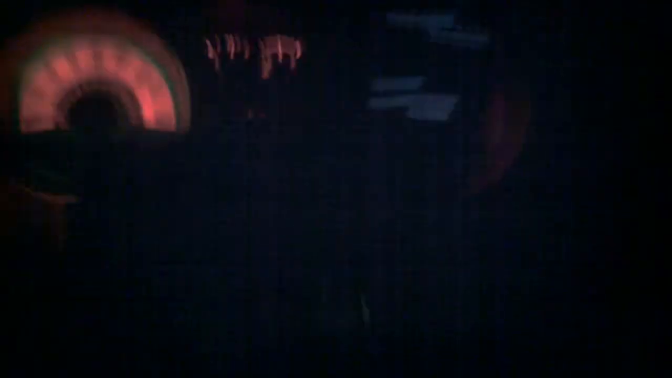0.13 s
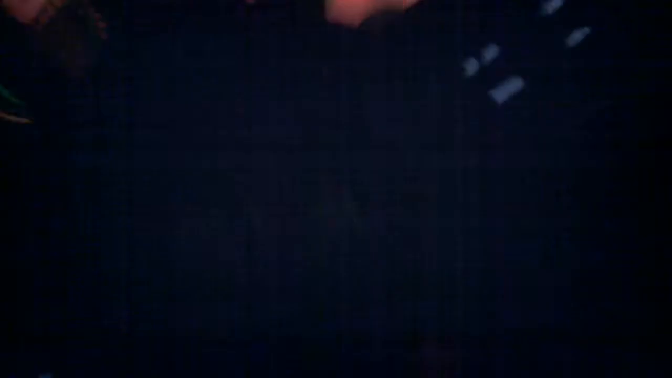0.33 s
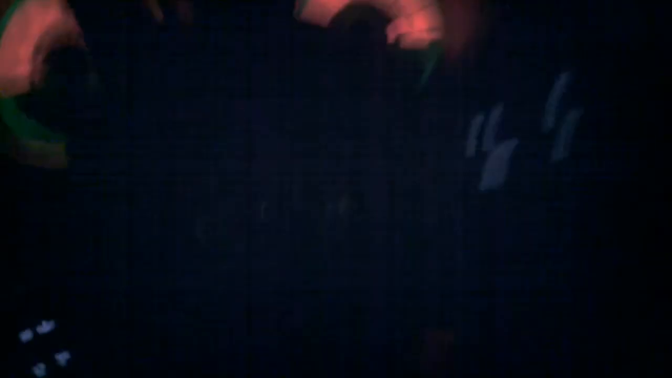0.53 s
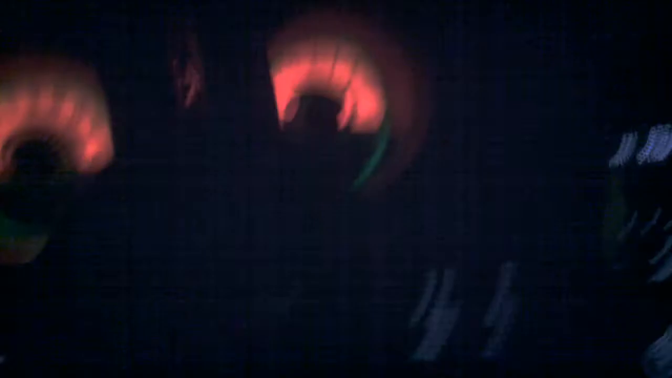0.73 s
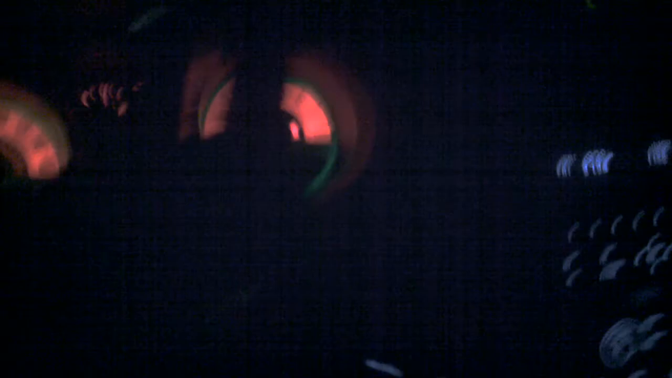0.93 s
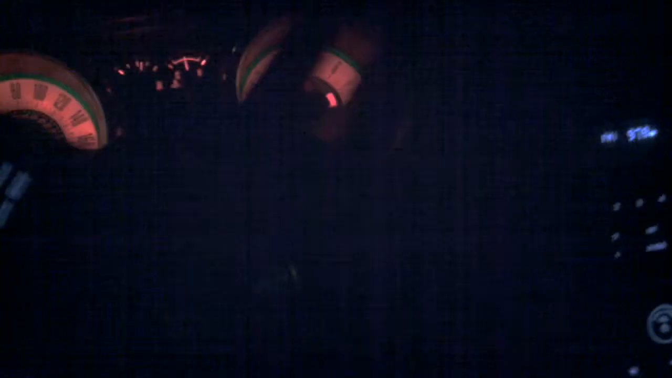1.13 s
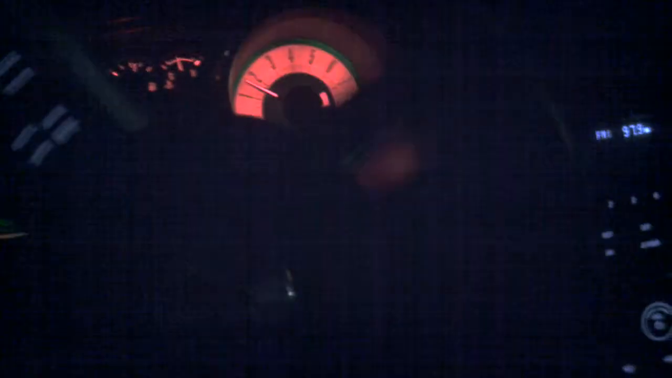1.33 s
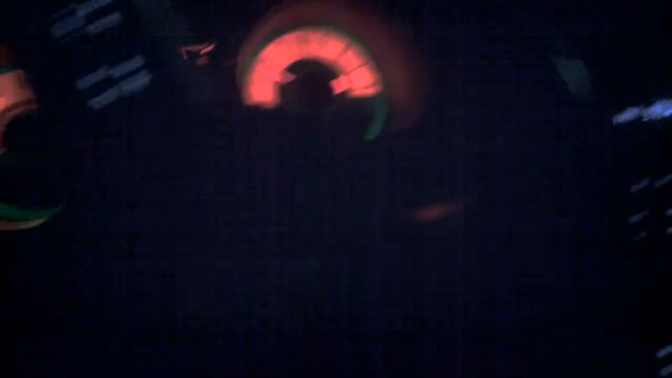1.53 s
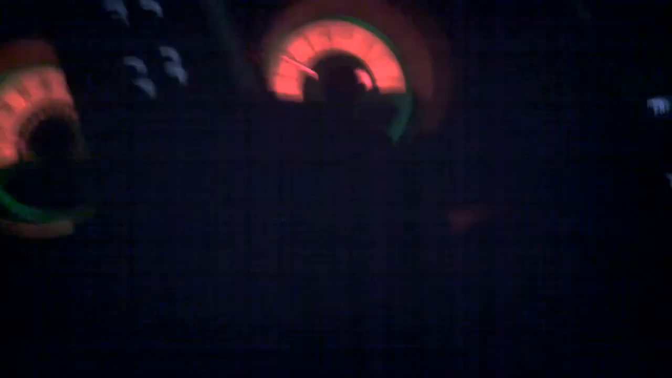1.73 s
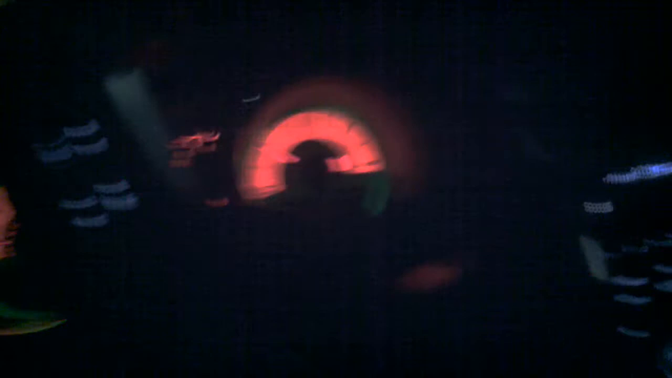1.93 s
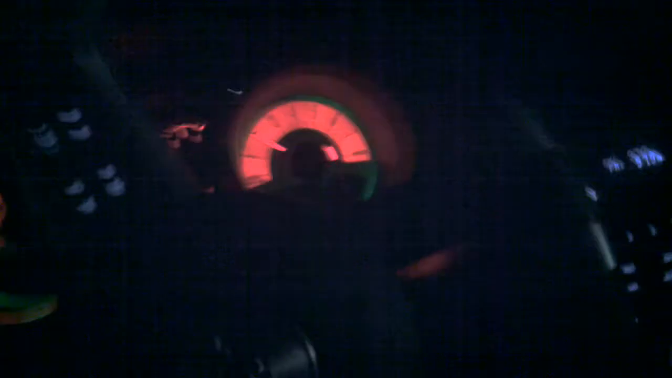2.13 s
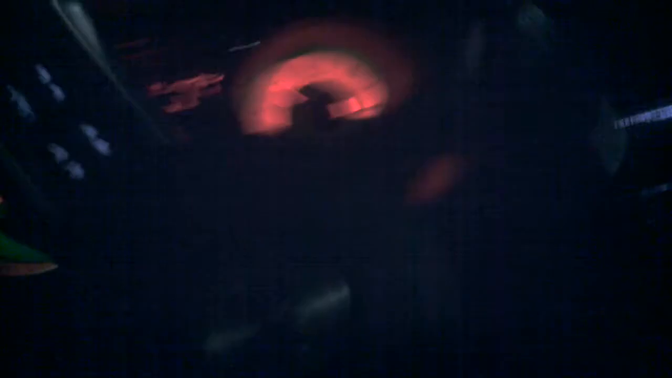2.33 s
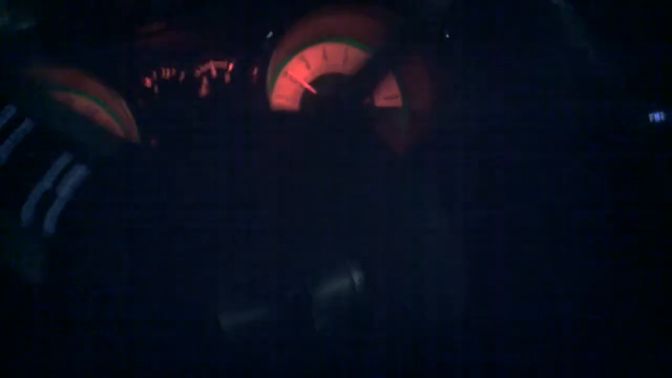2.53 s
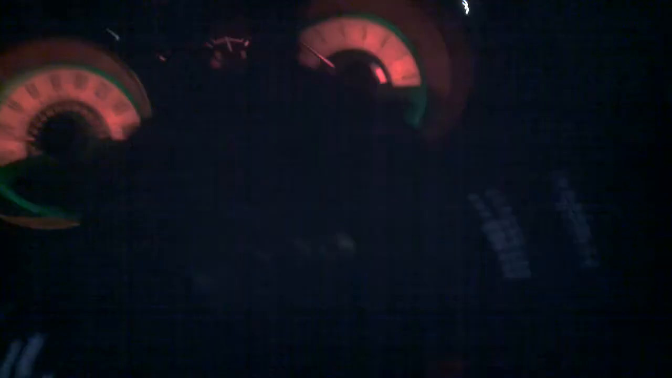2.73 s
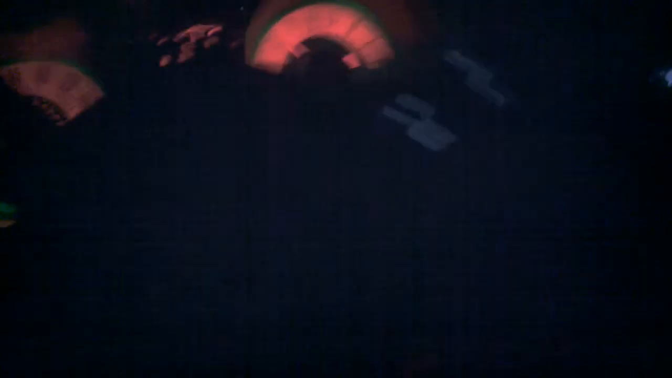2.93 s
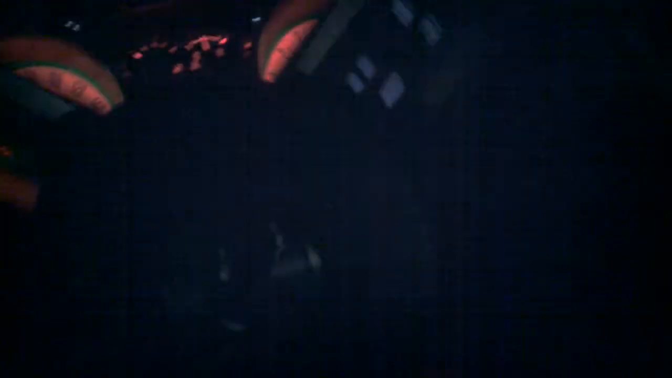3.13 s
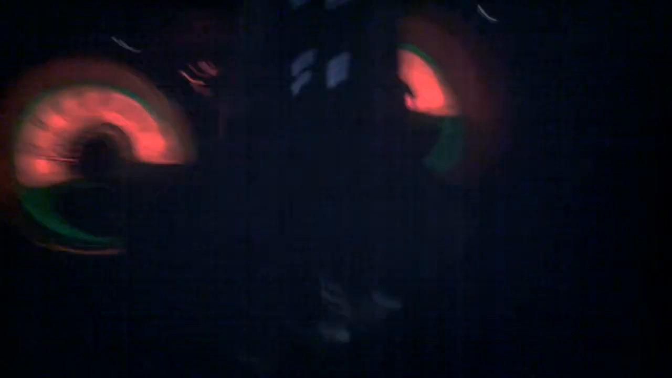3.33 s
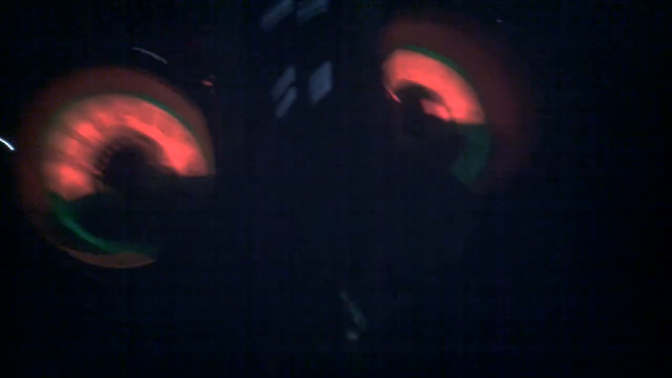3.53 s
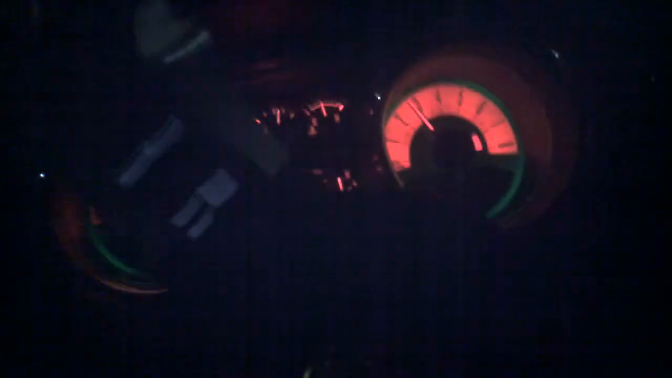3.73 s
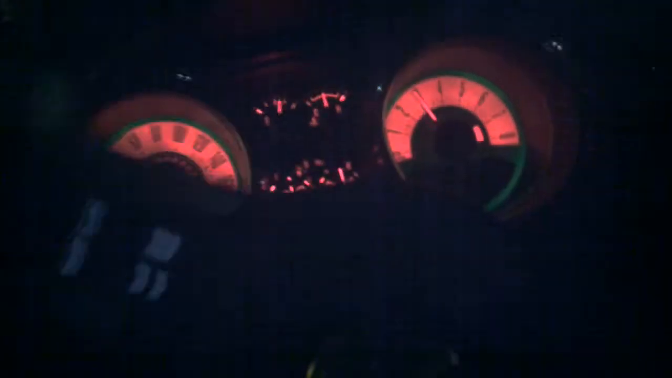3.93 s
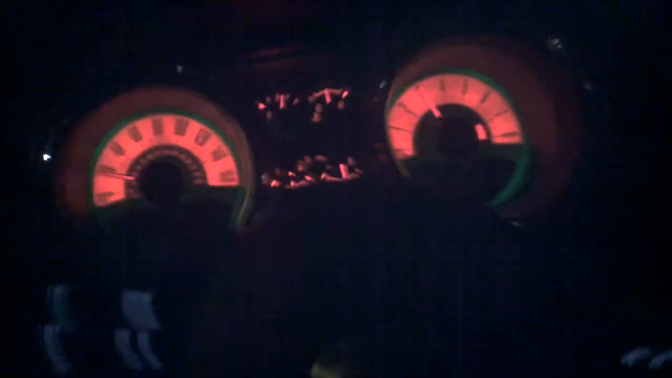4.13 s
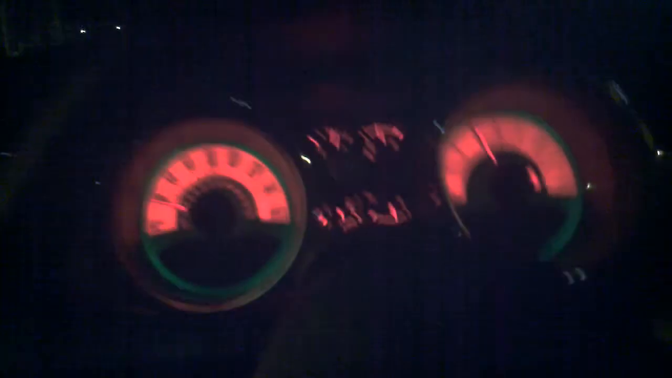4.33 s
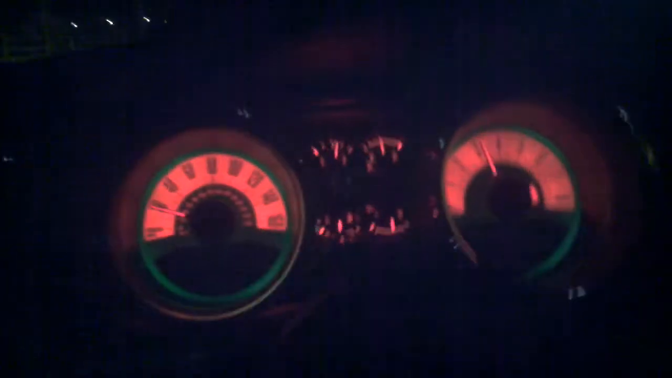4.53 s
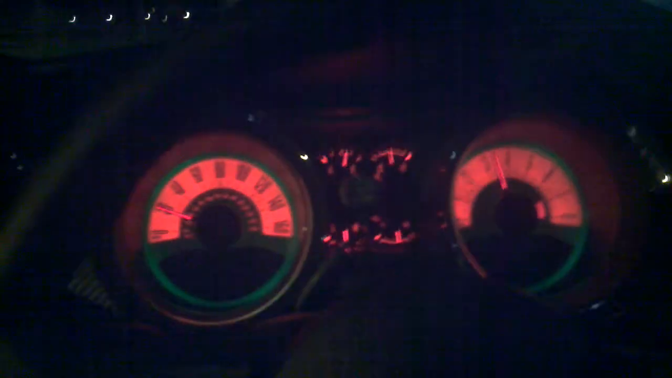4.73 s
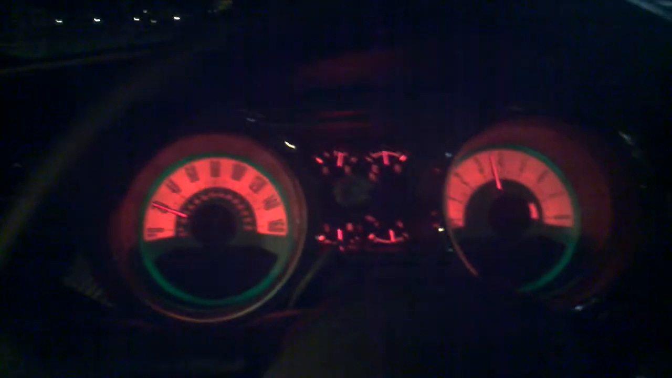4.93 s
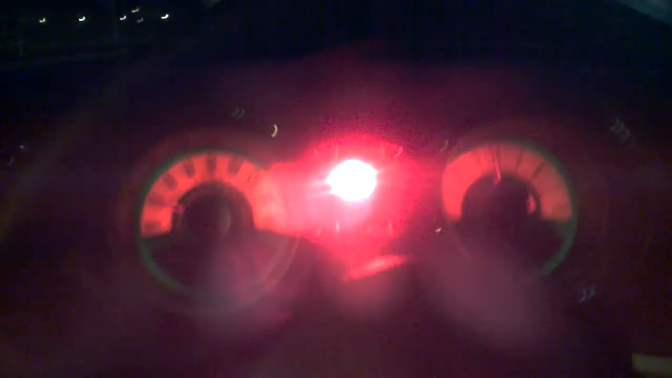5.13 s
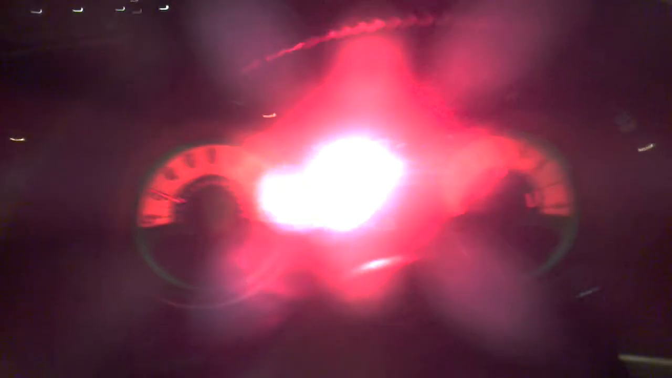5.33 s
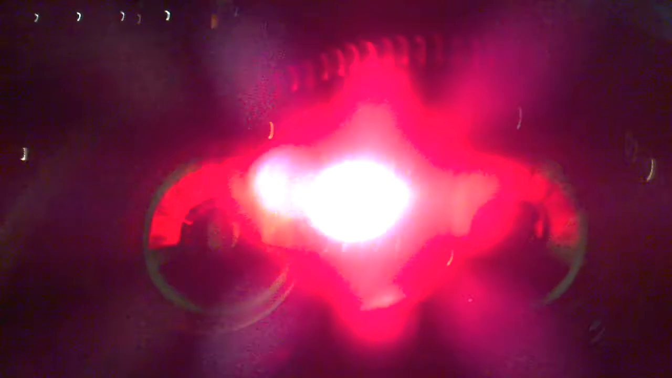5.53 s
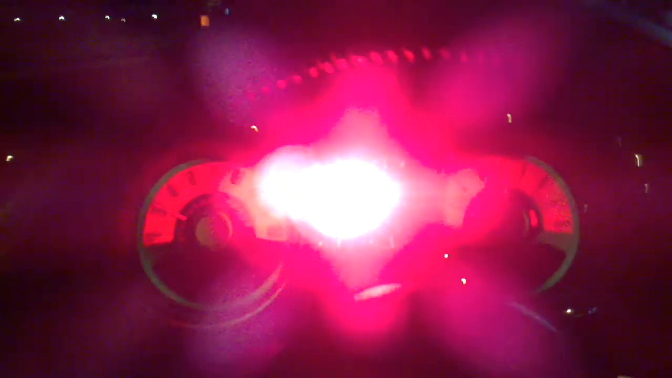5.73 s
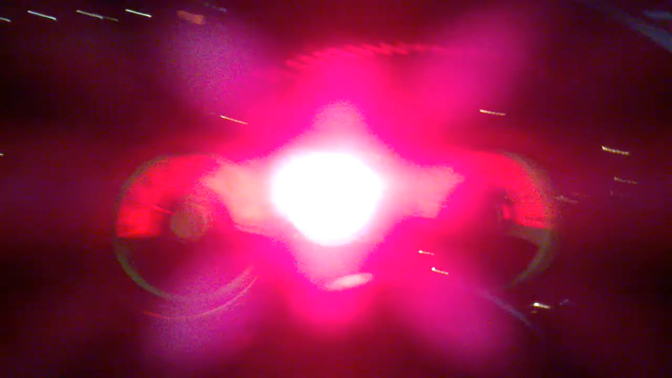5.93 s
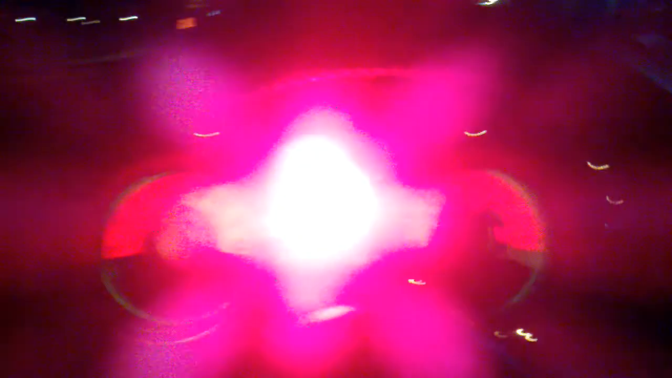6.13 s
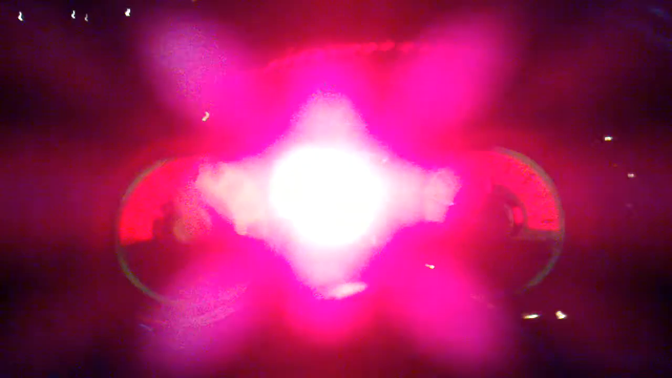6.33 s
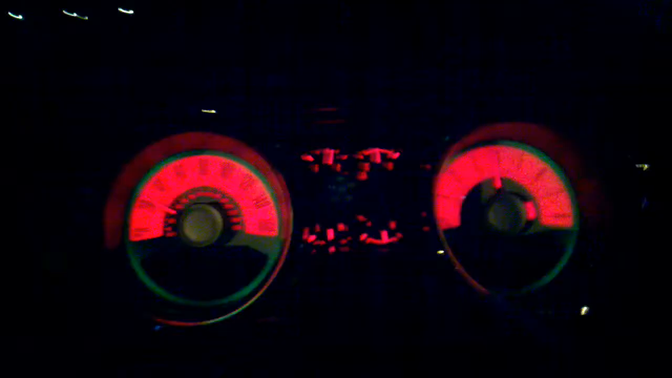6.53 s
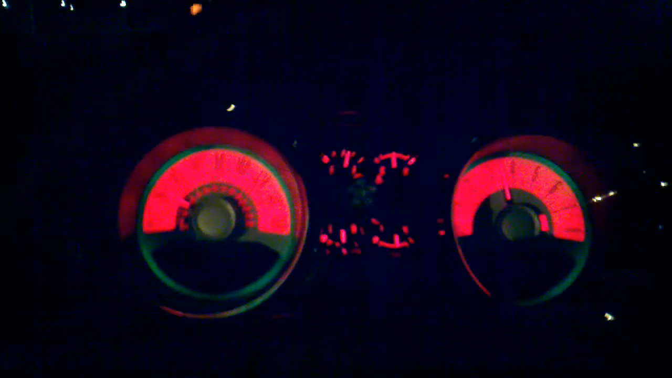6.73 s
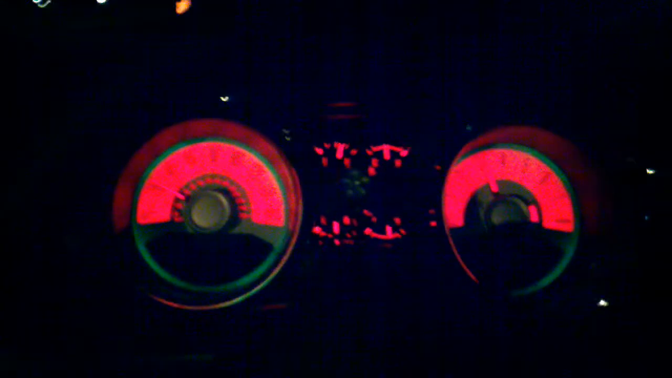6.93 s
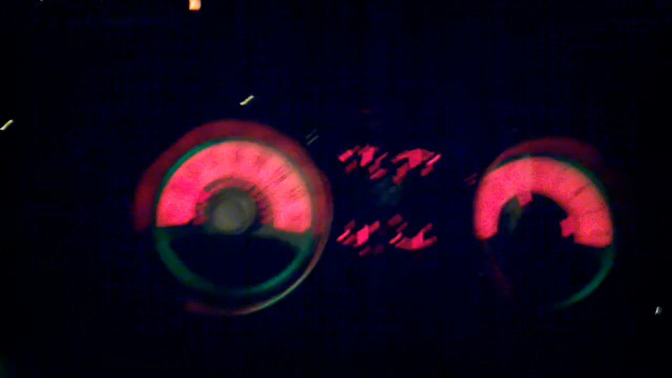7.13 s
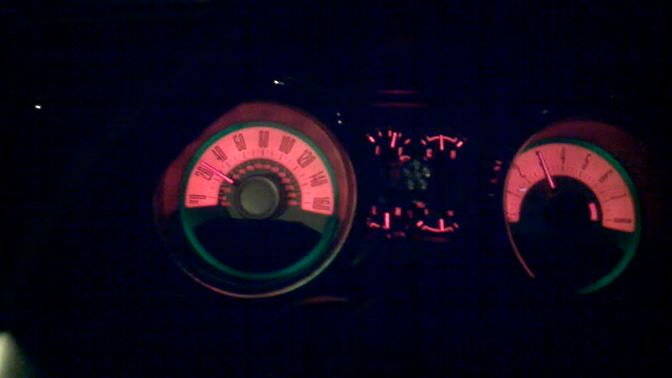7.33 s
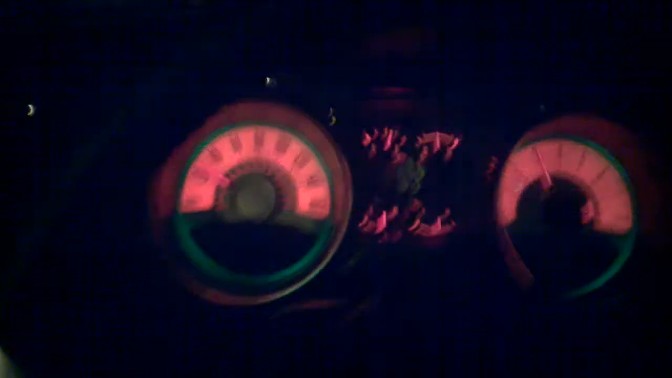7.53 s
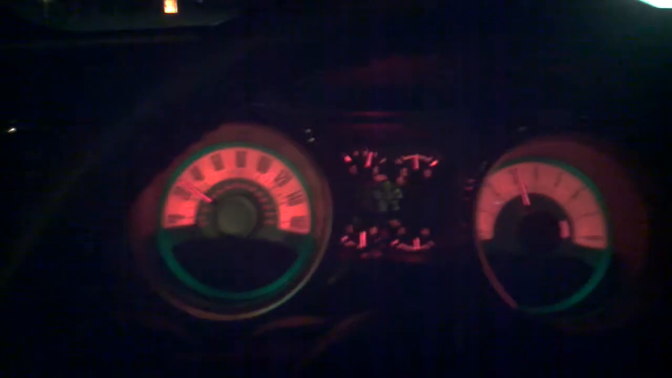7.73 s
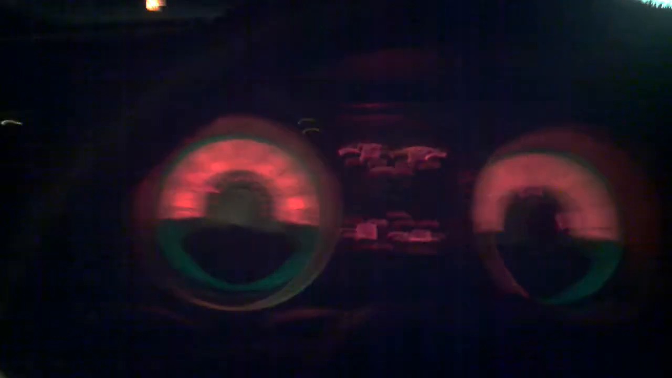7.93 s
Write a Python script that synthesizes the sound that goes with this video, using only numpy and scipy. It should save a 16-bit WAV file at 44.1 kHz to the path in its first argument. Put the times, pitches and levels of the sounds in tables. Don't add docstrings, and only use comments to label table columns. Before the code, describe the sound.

A handheld close stereo microphone in a car cabin catches a V8 accelerating. Low uneven rumble and shuddering thumps come first, with light key clinks, scuffs and one hard knock near two seconds. Revs rise smoothly, a faint gear whine beneath, until intake roar fills the cabin. A brief lift brings falling pitch and soft pops, then a sudden loud pull in the next gear to an abrupt end.

```python
import sys
import numpy as np
from scipy import signal
from scipy.fft import rfft, irfft, next_fast_len
from scipy.io import wavfile
from scipy.ndimage import uniform_filter1d

SR = 44100
rng = np.random.default_rng(int(sys.argv[2]) if len(sys.argv) > 2 else 0)


def persist_wave(psi):
    counts = np.round(np.clip(psi, -1, 1) * 32767).astype(np.int16)
    wavfile.write(sys.argv[1], SR, np.atleast_2d(counts).T)


def ratio(d):
    e = np.asarray(d, float) / 20
    return 10 ** e


N = 356328

# time_s, cycle_hz
CYCLE_RATE = [(0.0, 7.7), (0.45, 9.6), (0.95, 12.05), (1.12, 12.9), (2.81, 19.2), (3.42, 21.9),
              (4.12, 25.4), (4.61, 28.5), (5.2, 31.9), (5.93, 35.3), (6.0, 34.3), (6.14, 33.3),
              (6.34, 30.7), (6.6, 27.9), (6.9, 23.3), (7.05, 24.4), (7.2, 24.6), (8.08, 28.9)]
# time_s, effort_db, firing_evenness_db, burn_roughness_db
ENGINE_LOAD = [(0, -57.5, 2, -2.5), (.5, -61, -4.5, -3.5), (.85, -65, 12, 0), (1.3, -58.5, -1.5, -2),
               (1.9, -61.5, 3, 0.5), (2.7, -57, 2, -0.5), (3.3, -54.5, -8.5, 0), (4.15, -49.5, -1, 2.5),
               (4.65, -42, 8, -0.5), (5.05, -39.5, -4, -1.5), (5.55, -37, 5, -0.5), (5.83, -38.5, 12, -0.5),
               (6.0, -43, 8.5, -0.5), (6.3, -47, -5.5, 1.5), (6.75, -50.5, 5.5, -1.5),
               (7.05, -49.5, -2, 2.5), (7.4, -36, 0.5, -4.5), (8.08, -36, 5.5, -9)]
# time_s, rumble_db, length_s
BURN_POPS = [
    (6.063, 6, 0.084),
    (6.27, 3, 0.03),
    (6.51, 4, 0.033),
    (6.68, -3, 0.057),
    (6.816, 3.5, 0.038),
]

IDLE_DB = -60
LIFT_OFF_S, CLUTCH_IN_S, PEDAL_S = 5.95, 6.9, 0.08
EDGE_HZ = 14020
LIFT_HZ = 413


def evened(x):
    return x / np.sqrt(np.mean(x ** 2) + 1e-20)


def curves(rows):
    s, *columns = np.transpose(rows)
    return [np.interp(np.arange(N) / SR, s, c) for c in columns]


def read(points, hz):
    f, value = np.transpose(points)
    return np.interp(np.log(hz + 1), np.log(f), value)


def ramp(start_s, length_s):
    return np.clip((np.arange(N) / SR - start_s) / length_s, 0, 1)


def bumps(rows):
    t = np.arange(N) / SR
    return sum(height * np.exp(-((t - s) / length_s) ** 2) for s, height, length_s in rows)


def add(mix, start_s, sound):
    part = mix[:, round(start_s * SR):][:, :sound.shape[1]]
    part += sound[:, :part.shape[1]]


def filtered(x, response):
    size = next_fast_len(N + 8192)
    mirror = x[..., :-2049:-1] * np.linspace(1, 0, 2048)
    padded = np.concatenate([x, mirror], -1)
    return irfft(rfft(padded, size) * response(np.fft.rfftfreq(size, 1 / SR)), size)[..., :N]


def butter(x, order, hz, kind="low"):
    return signal.sosfilt(signal.butter(order, hz, kind, fs=SR, output="sos"), x)


def drift(count, per_s):
    steps = evened(uniform_filter1d(rng.standard_normal((count, 400)), 3, 1))
    return [np.interp(np.arange(N) / SR * per_s * 2, np.arange(400), row) for row in steps]


def patchy(spectrum, patchy_db, same, alike, tilt_db):
    frames, hz = N // 128 + 5, np.fft.rfftfreq(512, 1 / SR)
    a, b, patches = rng.standard_normal((3, 2, frames, 257)).transpose(0, 1, 3, 2)
    patches = evened(uniform_filter1d(uniform_filter1d(patches[0], 8, 0), 20, 1))
    z = (a + 1j * b) * ratio(read(spectrum, hz)[:, None] + patchy_db * patches)
    z[1] = alike * z[0] + np.sqrt(1 - min(alike, 1) ** 2) * z[1]
    z[1] *= ratio(tilt_db * np.log2(hz / 2000 + 0.12))[:, None]
    x = signal.istft(z, nperseg=512, noverlap=384)[1][:, :N]
    return x / x[0].std() * [[1], [same]]


def off_throttle():
    shift = ramp(LIFT_OFF_S, PEDAL_S) - ramp(CLUTCH_IN_S - PEDAL_S, 2 * PEDAL_S)
    sag = shift * ramp(LIFT_OFF_S, CLUTCH_IN_S - LIFT_OFF_S) ** 2
    return shift, sag


def road_hiss():
    # freq_hz, level_db
    hiss_spectrum = [(1500, -6.5), (3000, -3.5), (4300, -5.5), (5500, -10), (7000, -4), (9300, -6.5),
                     (10000, -5.5), (12000, -9.5), (14000, -12.5)]
    # time_s, swell_db, length_s
    rasps = [(.03, -2, 0.014), (3.6, 1, 0.2), (4.5, -1, 0.11), (5.45, 3.5, .15), (5.82, 2.5, 0.06),
             (6.8, -4.5, 0.14), (7.56, 5.5, 0.084), (7.95, 2.5, 0.13)]
    effort_db = curves(ENGINE_LOAD)[0]
    level_db = -70.5 + 0.47 * (effort_db - IDLE_DB) + 8 * ramp(7.23, 0.24)
    level_db = level_db + np.maximum(bumps(BURN_POPS), 0) + 1.3 * bumps(rasps)
    gusts_db = 1.1 * drift(count=1, per_s=10.0)[0]
    rush = patchy(hiss_spectrum, patchy_db=1.5, same=2.0, alike=0.02, tilt_db=0.0)
    return ratio(level_db + gusts_db) * rush


def intake_roar(turns):
    # freq_hz, level_db
    roar_spectrum = [(600, 4.5), (900, 3.5), (1300, -4), (1620, 1), (1800, 0), (1980, -1), (2400, -1.5),
                     (2800, -6), (3400, -9.5), (4300, -14), (5200, -4.5), (7000, -40.5)]
    # freq_hz, bandwidth_hz, level_db
    panel_rings = [(966, 31, 7.5), (1059, 11, 15.5), (1146, 49, 4), (1270, 9.1, -3.5), (1533, 43, 7.5),
                   (1623, 45, 8.5), (1773, 35, 0.5), (1868, 76, 5), (1980, 40, 7), (2150, 180, -1),
                   (2440, 110, 1.5), (3060, 110, 1), (3337, 41, 7.5), (3540, 37, 3.5), (3655, 69, 2.5),
                   (4110, 61, -0.5)]
    # time_s, swell_db, length_s
    rasps = [(.03, -2, 0.014), (3.6, 1, 0.2), (4.5, -1, 0.11), (5.45, 3.5, .15), (5.82, 2.5, 0.06),
             (6.8, -4.5, 0.14), (7.56, 5.5, 0.084), (7.95, 2.5, 0.13)]

    def panels(hz):
        return 1 + sum(ratio(db) / (1 + 2j * (hz - f) / bw_hz) for f, bw_hz, db in panel_rings)

    effort_db = curves(ENGINE_LOAD)[0]
    puffs = evened(1.3 + np.exp(-(8 * turns % 1) / 0.13))
    rush = patchy(roar_spectrum, patchy_db=1.5, same=2.16, alike=0.38, tilt_db=-3.5)
    rung = filtered(rush, panels)
    ring_share = np.clip((effort_db + 62) / 20, 0.48, 1)
    roar = (rush + ring_share * (rung - rush)) / np.sqrt(np.mean(rung ** 2))
    return ratio(effort_db + 3.0 + 0.21 * bumps(rasps)) * puffs * roar


def knocks():
    # time_s, peak_db, ring_hz, t60_s, ring_share
    trim_knocks = [(.075, -39.5, 906, 0.067, 0.7), (0.166, -34, 920, 0.034, 0.45),
                   (0.215, -35, 1900, 0.088, 0.08), (0.254, -29, 1390, 0.033, 0.15),
                   (0.303, -39, 1563, 0.11, 0.32), (0.317, -31.5, 3320, 0.11, 0),
                   (0.333, -29, 1660, 0.084, 0.07), (0.362, -30, 1770, 0.065, 0),
                   (1.105, -42, 2010, .04, 0.4), (1.40, -32, 2140, 0.062, 0.1),
                   (1.893, -14, 487, 0.037, 1.02), (1.893, -18, 3660, 0.014, 0.15),
                   (1.9, -31, 286, 0.057, 1), (2.141, -37, 2080, 0.044, 0.3)]
    t, out = np.arange(6000) / SR, np.zeros((2, N))
    for s, db, hz, t60_s, ring_share in trim_knocks:
        tick = butter(rng.standard_normal((2, len(t))), 2 * 2, 4300) * ratio(-60 * t / t60_s)
        tick = signal.lfilter([0.3], [1, -0.85], tick)
        ring = np.sin(2 * np.pi * hz * t)
        ring = ring + 0.5 * np.sin(2 * np.pi * 1.14 * hz * t) + 0.1 * np.sin(2 * np.pi * 2.7 * hz * t)
        envelope = ratio(db - 60 * t / t60_s) * (1 - np.exp(-t / 0.0027)) ** 2
        add(out, s, envelope * (ring_share * ring * [[1], [0.6]] + 0.42 * tick))
    return out


def keys():
    # time_s, peak_db, strongest_ring_hz, length_s
    clinks = [(0.217, -51, 11200, 0.052), (0.37, -48, 12300, 0.032), (0.394, -51.5, 12300, 0.075),
              (0.754, -56, 6700, 0.11), (0.816, -58, 5600, 0.041), (0.95, -56, 11500, 0.035),
              (1.023, -53.5, 12300, 0.07), (1.068, -38.5, 8760, 0.028), (1.237, -45.5, 6900, 0.046),
              (1.44, -49.5, 5560, 0.032), (1.476, -53.5, 12300, 0.067), (1.548, -43, 9484, 0.034),
              (1.578, -51.5, 12100, 0.038), (1.834, -52, 12300, 0.1), (1.87, -54, 12100, 0.02),
              (1.96, -51.5, 5670, 0.038), (1.994, -63.5, 4580, 0.053), (2.537, -61.5, 4600, 0.021),
              (2.665, -44, 11600, 0.05), (3.149, -49.5, 13750, 0.014), (3.153, -45.5, 5700, 0.018),
              (3.942, -49.5, 9100, 0.046), (4.197, -53.5, 11400, 0.029), (7.044, -38.5, 9400, 0.0084)]
    # freq_hz, level_db, t60_s
    key_modes = [(5670, 2.5, 0.05), (6900, -14, .07), (7300, -14, 0.06), (9350, -0.5, 0.05),
                 (11400, -4, .07), (12300, -1, .09), (13050, -3, .07)]
    t, out = np.arange(6000) / SR, np.zeros((2, N))
    rise = 1 - np.exp(-(t / 0.004) ** 2)
    draws = rng.standard_normal((len(clinks), 2, len(key_modes) + 1))
    for (s, db, hz, length_s), draw in zip(clinks, draws):
        contacts = rng.standard_normal((2, len(t))) * np.exp(-(t / length_s) ** 3.1)
        contacts = contacts * np.abs(contacts) / 1.5
        ring = np.zeros(len(t))
        for (f, mode_db, t60_s), u, v in zip([*key_modes, (hz, 6, 0.07)], *draw):
            decay = ratio(mode_db + 3.5 * u - 60 * t / t60_s)
            ring += decay * np.sin(2 * np.pi * f * (1 + 0.004 * v) * t)
        ring = np.array([ring, ring]) / np.abs(ring).max()
        scrape = butter(contacts, 4, 4500, "high")
        chatter = butter(contacts, 2, [0.94 * hz, min(1.06 * hz, EDGE_HZ)], "band")
        add(out, s, ratio(db + 1.0) * rise * (1.15 * ring + 0.23 * scrape + 0.25 * chatter))
    return out


def clutch_shudder():
    # time_s, peak_db, length_s
    grabs = [
        (0.097, -31, 0.059),
        (0.181, -20.5, 0.014),
        (0.268, -22.5, 0.029),
        (0.388, -20, 0.024),
        (0.496, -24, 0.043),
        (0.62, -27, 0.056),
        (0.72, -29, 0.048),
    ]
    t = np.arange(N) / SR
    slip, upper_slip = drift(count=2, per_s=20.0)
    ring = np.cos(2 * np.pi * 135 * t + 0.21 * slip)
    ring = ring + ratio(-15.5) * np.cos(2 * np.pi * 300 * t + 0.69 * upper_slip)
    return bumps([(s, ratio(db), length_s) for s, db, length_s in grabs]) * ring * [[1], [0.3]]


def gear_whine(turns):
    teeth, peak_s, span_s = 58.3, 0.6, 2.6
    slip, waver = drift(count=2, per_s=22.0)
    tone = np.cos(2 * np.pi * teeth * turns + 0.51 * slip)
    level_db = -61 - 13 * ((np.arange(N) / SR - peak_s) / span_s) ** 2
    return ratio(level_db + 2 * waver) * tone * [[1], [0.8]]


def cabin(hz):
    # freq_hz, bandwidth_hz, pressure_db, difference_db
    cabin_modes = [(76, 5.2, -7, -10), (101.9, 19.6, -3.5, -4.5), (126, 10.8, 5, -10),
                   (143.8, 21.3, 6, -3.5), (193, 59, -7.5, -24), (205.6, 2.6, 3, -21), (240, 32, -33, -1),
                   (276.9, 2.9, 2, -16), (299.8, 30.3, 5, -10.5), (340, 14, -0.5, 4), (369.5, 26, -3, -2.5),
                   (400.6, 24, -8, -0.5), (454.7, 45.5, -1.07, -7.5), (531, 38, -5, -9.5),
                   (617, 52, -4, -7), (659.8, 19, -5.5, -5), (794, 79, -14, -21), (1060, 9.1, -20, -26),
                   (1082, 5.1, -16.5, -25.5)]
    # freq_hz, lead_rad
    port_lead = [(70, 2.), (95, .9), (112, .1), (125, 1.3), (170, 1.4), (205, -1.5), (240, 1.8), (275, .7),
                 (300, -.4), (345, .2), (375, 1.), (410, -1.7), (455, -1.1), (540, -3.6), (620, .1),
                 (660, 1.), (900, 1.5)]
    valley_db = -20.5
    f, bw_hz, *dbs = np.transpose(cabin_modes)
    shape = 1 / (1 + (2 * (hz[:, None] - f) / bw_hz) ** 2) ** 1.5
    gain = np.array([np.log(shape @ ratio(2 * db) + ratio(2 * valley_db)) / 2 for db in dbs])
    gain -= np.log(1 + (62 / (hz + 1)) ** 14) / 2 + np.log(1 + (hz / 1200) ** 6) / 2
    cepstrum = irfft(gain[0])
    cepstrum[len(cepstrum) // 2:] = 0
    phase = 2 * rfft(cepstrum).imag
    return np.exp(gain + 1j * np.array([phase, phase + read(port_lead, hz)]))


def burn_rumble(turns):
    boom_hz = 192
    effort_db, _, rough_db = curves(ENGINE_LOAD)
    burns = rng.standard_normal((2, N)) * (1 + 0.029 * np.cos(2 * np.pi * turns))
    upper = butter(np.array([burns[0], 0.33 * burns[0] + 1.74 * burns[1]]), 2, boom_hz, "high")
    boom = butter(rng.standard_normal((2, N)), 2, boom_hz)
    boom = np.array([boom[0], 0.33 * boom[0] + 1.17 * boom[1]])
    loaded = np.clip((effort_db + 52) / 12, 0, 1) * (1 - off_throttle()[0])
    level_db = -24.5 + 0.56 * (effort_db - IDLE_DB) + rough_db + bumps(BURN_POPS)
    return ratio(level_db) * (upper + ratio(-10.5 * loaded) * boom)


def engine_orders(turns):
    # level_db at each of four rising rates, next_gear_db
    order_levels = [(12, 16, -3, 5, -18), (-3, -15.5, 0, 3, -2.5), (3.5, -1, 6, -0.5, 6.5),
                    (2, 3, 3, 12.5, 3.5), (9, 13, 15.5, 7, 14), (9.5, 16, 16, 11, 12),
                    (13, 14.5, 8, 10, 11.5), (14, 6.5, -5.5, 3, 4.5), (11.5, 3, 7, 2.5, 2),
                    (9, -4.5, -11, 10.5, -4), (-1, -16, 5, 9, -3.5), (0.5, -7.5, 9, 14, 4),
                    (1, 5.5, 12, 3.5, 1.5), (8.5, 0.5, 9, 11.5, 7.5), (5.5, 13.5, 11.5, 4.5, 14.5),
                    (-1, 4, -4, -3.5, 2), (7, -1.5, 9.5, 3.5, 4.5), (1, 1.5, -15, -9.5, 2.5),
                    (5.5, -3, -17.5, -0.5, 5.5), (-10, 14.5, -2, 15, 5.5), (6, 1, 2.5, 6.5, 4),
                    (0.5, -1.5, -8.5, 15.5, 5.5), (4.5, 2, 6, 2, 10.5), (3, -4, -2, 10, 4.5),
                    (3, -14, 3, 4.5, 7), (-9.5, -10, 3, 14.5, 1.5), (-18.5, -1.5, -11, -9, -7),
                    (-1, -8.5, -3, 14, 10.5), (2, -23, 8, 0, -10), (1, -4, 4.5, 7, 11),
                    (3, -7.5, 11, 1, 11.5), (-9, -10.5, -1, 5.5, 6), (-1.5, -3, -7.5, 13.5, 6.5),
                    (-10.5, -5.5, -3.5, 10, -5), (-21, -10, 0, -14, -0.5), (-17.5, 0, -4, -4, 13),
                    (-3.5, -22.5, -6, -4, -7), (-21.5, -20, -5.5, 2, -6), (-0.5, -8, 6, -9, 10.5)]
    rates_hz = [15, 20, 26, 33]
    bank_levels = [2.5, -2, 10, 5.5, -20, 13, -1.5, 0]
    orders = [(k, *row) for k, row in enumerate(order_levels, start=2)]
    for k in range(len(order_levels) + 2, 49):
        orders.append((k, *[-11 - 0.1866 * (k - 25) + bank_levels[k % 8]] * 5))

    revs_hz = curves(CYCLE_RATE)[0]
    effort_db, firing_db, _ = curves(ENGINE_LOAD)
    shift, sag = off_throttle()
    drive_db = -46.5 + 0.28 * (effort_db - IDLE_DB) - shift - 5 * sag + 0.325 * bumps(BURN_POPS)
    low_db = 11.5 * (shift - sag)
    lead_db = 13.5 * np.clip(1.3 - np.arange(N) / SR, 0, 1)
    mute_db = -2 * (1 - ramp(0.42, 0.48))
    next_gear = ramp(CLUTCH_IN_S - 2 * PEDAL_S, 2 * PEDAL_S)
    refill_db = -11.5 * (1 - ramp(CLUTCH_IN_S, 0.35))

    tone = np.zeros((2, N))
    wavers, slips = drift(len(orders), 5.0), drift(len(orders), 9.0)
    for (k, *dbs, geared_db), waver, slip in zip(orders, wavers, slips):
        between = k > 8 and k % 8 > 0
        level_db = firing_db * (k in (8, 16, 24)) + lead_db * (k == 8) - lead_db * (k == 24)
        level_db = level_db + low_db * max(1 - abs(k - 4) / 3.5, -0.2)
        level_db = level_db - 0.28 * firing_db * between + mute_db * (k > 9)
        level_db = level_db + (1 - next_gear) * np.interp(revs_hz, rates_hz, dbs)
        level_db = level_db + next_gear * (geared_db + refill_db * (k > 20))
        ragged = 2.6 if k > 10 and k not in (16, 24) else 1 + 0.5 * (k == 24)
        unsteady = 0.6 * np.sqrt(k / 8) * ragged + 2.6 * shift * min((k / 9) ** 2, 3)
        apart_rad = np.array([0 * waver, 1.1 * waver * between])
        wave = np.cos(2 * np.pi * (k * turns + rng.random()) + 0.3 * unsteady * slip + apart_rad)
        tone += ratio(level_db + 1.5 * unsteady * waver - 0.3 * unsteady ** 2) * wave
    return ratio(drive_db) * tone


def exhaust(turns):
    return filtered(engine_orders(turns) + burn_rumble(turns), cabin)


def scene():
    turns = np.cumsum(curves(CYCLE_RATE)[0]) / SR
    mix = road_hiss() + intake_roar(turns) + knocks() + keys()
    mix = mix + clutch_shudder() + gear_whine(turns) + exhaust(turns)
    pressure, difference = mix
    difference = filtered(difference, lambda hz: 0.5j * hz / (LIFT_HZ + 1j * hz))
    return np.array([pressure + difference, pressure - difference])


def roll_off(x):
    return signal.sosfilt(signal.butter(12, 14010, fs=SR, output="sos"), x)


def record(dry):
    delay_s = 17 / SR

    def crossing(hz):
        treble_loss = 0.58 / (1 + (4700 / (hz + 1)) ** 12)
        return (1 - treble_loss) * np.exp(-2j * np.pi * hz * delay_s)

    def bass_lift(hz):
        return (1 + LIFT_HZ / (1j * hz + 20)) * (hz < EDGE_HZ) / np.sqrt(1 + (48 / (hz + 1)) ** 4)

    lifted = filtered(dry - filtered(dry[::-1], crossing), bass_lift)
    lifted = lifted + 0.03 * np.exp(-np.arange(N) / SR / 0.003)
    lifted = lifted * np.minimum((N - np.arange(N)) / 400, 1)
    return roll_off(lifted)


dry = scene()
out = record(dry)
persist_wave(out)
```